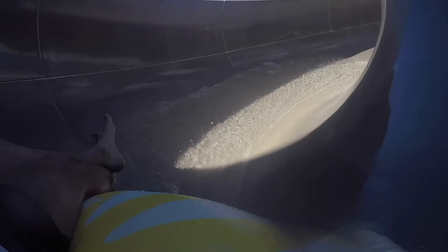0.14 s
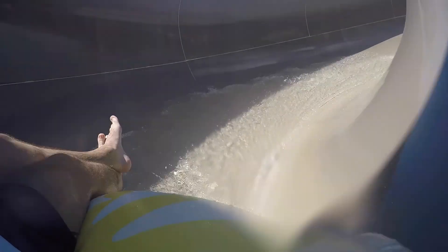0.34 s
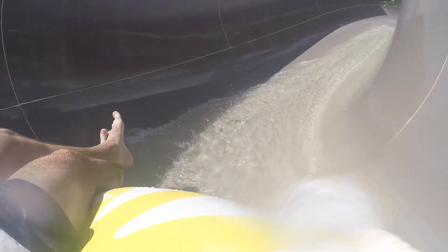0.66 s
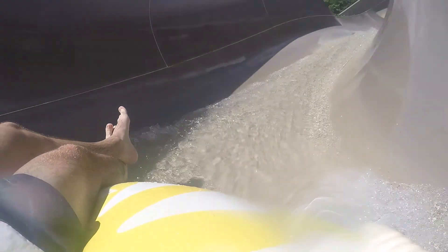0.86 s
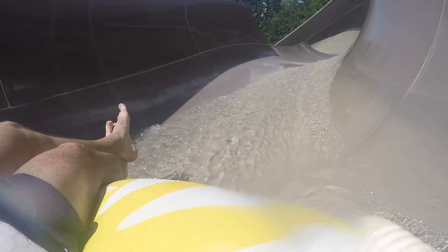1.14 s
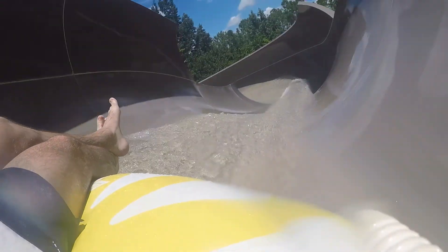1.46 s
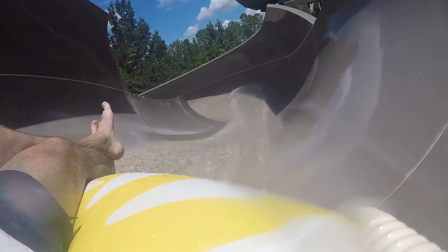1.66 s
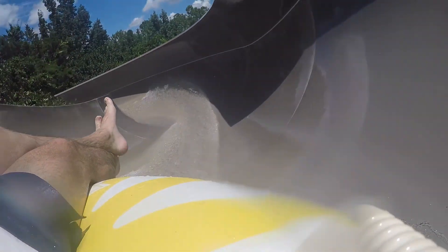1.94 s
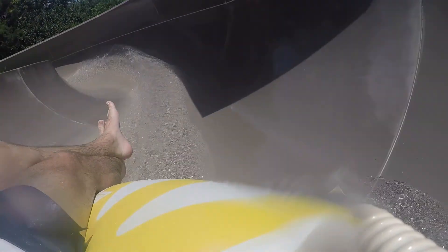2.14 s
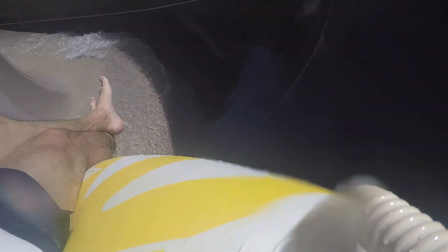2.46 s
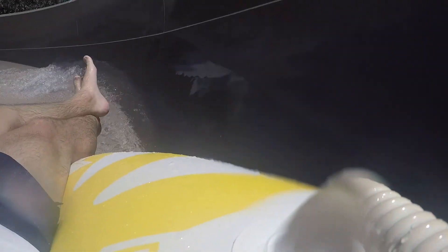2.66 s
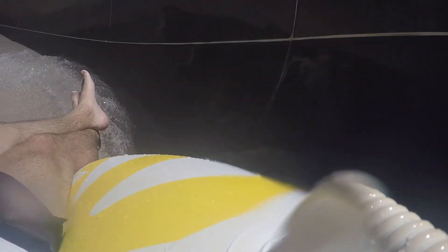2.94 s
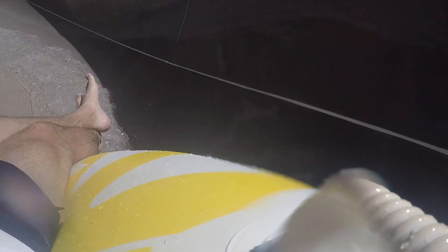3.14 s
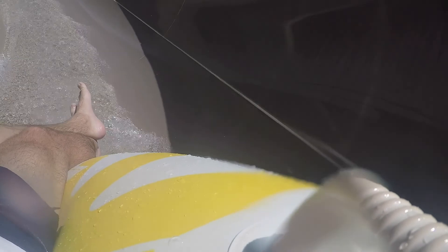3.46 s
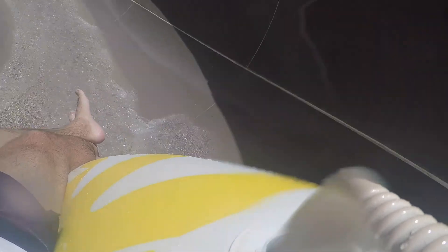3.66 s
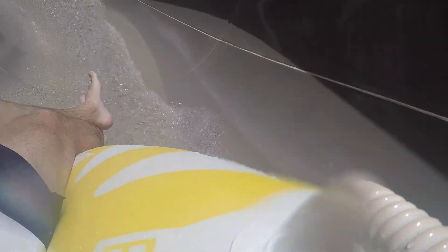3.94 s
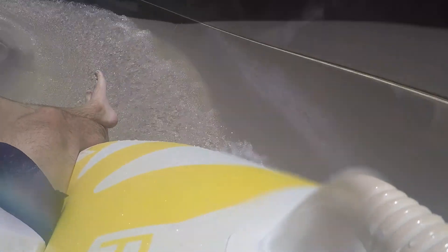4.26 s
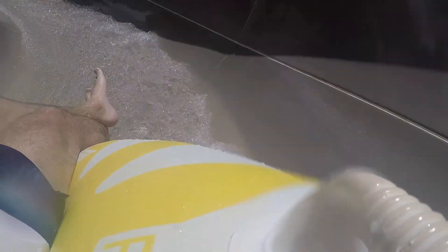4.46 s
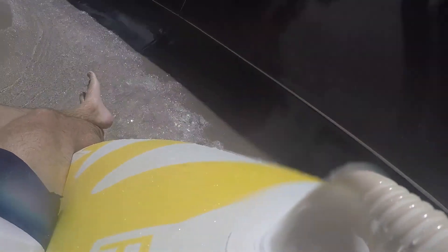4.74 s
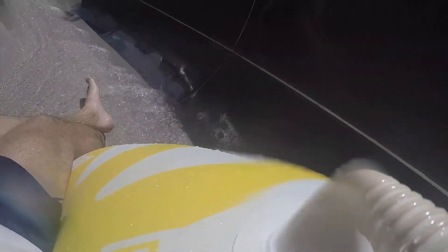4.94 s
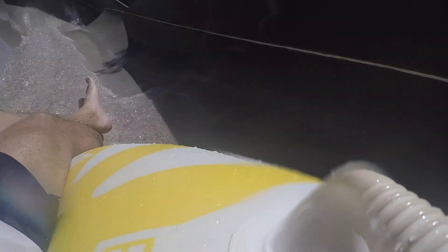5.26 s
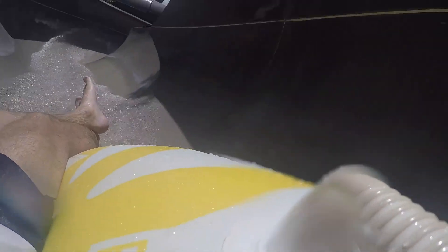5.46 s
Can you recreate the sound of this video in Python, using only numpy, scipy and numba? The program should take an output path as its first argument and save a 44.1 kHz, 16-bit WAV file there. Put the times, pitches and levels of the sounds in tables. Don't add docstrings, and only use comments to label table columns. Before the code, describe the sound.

Steady mid-range water roar with bubbling, fizz and splatter, heard from inside a waterproof case riding on the tube. It begins bright with spray, eases slightly around one to two seconds, then grows fuller and busier. Very low wobbling bumps and flume rumble run below, with brief falling thumps as joints pass. One short sharp knock sounds past the middle; a bubble blips near the end.

```python
import sys
import numpy as np
from scipy import signal
from scipy.fft import rfft, irfft
from scipy.io import wavfile
from scipy.ndimage import uniform_filter1d
from numba import njit

SR = 44100
rng = np.random.default_rng(int(sys.argv[2]) if len(sys.argv) > 2 else 0)


def to_wav(s):
    ch = np.atleast_2d(s).T
    pcm = np.round(np.clip(ch, -1, 1) * 32767)
    wavfile.write(sys.argv[1], SR, pcm.astype(np.int16))


def boost(x):
    u = np.asarray(x, float) / 20
    return 10 ** u


N = 246519
T = np.arange(N) / SR
HZ = np.fft.rfftfreq(N, 1 / SR)

# time_s, water_round_tube_db, spray_thrown_up_db
FLOW = [(0, 0.5, 2.5), (.3, 0.5, -0.5), (.65, -0.5, -1), (1.0, -1, 0.5), (1.12, -1.5, -7.5),
        (1.35, 0.5, -4.5), (1.9, 0.5, -4), (2.1, 0, -5), (2.3, 2, -5), (2.65, 1.5, 2), (2.85, 2.5, 1),
        (3.2, 2, 3.5), (3.55, 1.5, 4), (3.85, -0.5, 1), (4.2, 0, -0.5), (4.6, 0, 3), (5.2, 0.5, 3),
        (5.59, 0, -3)]
# middle_s, level_db, length_s, pitch_hz
JOLTS = [(0.024, -16, 0.029, 28.5), (0.114, -20.5, 0.039, 28), (0.252, -27.5, 0.068, 33.1),
         (0.457, -21.5, 0.1, 38.72), (0.596, -22.5, 0.019, 32.97), (0.704, -32, 0.027, 31.2),
         (0.786, -46, 0.052, 28.4), (0.893, -26.5, 0.057, 41.3), (0.945, -31, 0.038, 37.13),
         (1.07, -41, 0.036, 30.3), (1.15, -27.5, 0.037, 32.5), (1.244, -39, 0.05, 37.94),
         (1.312, -35, 0.053, 33.1), (1.437, -26, 0.11, 40.16), (1.642, -30.5, 0.099, 30.63),
         (1.822, -29.5, 0.084, 28.1), (1.96, -24.5, 0.048, 26.1), (2.028, -41, 0.045, 30.7),
         (2.119, -27.5, 0.043, 25.1), (2.258, -21, 0.061, 26.5), (2.36, -19, 0.051, 35.58),
         (2.475, -20, 0.061, 24.1), (2.587, -24.5, 0.043, 25.6), (2.7, -18.5, 0.085, 29.12),
         (2.932, -18, 0.078, 30.6), (3.081, -14, 0.028, 33.75), (3.155, -12, 0.07, 35),
         (3.298, -16, 0.066, 29.7), (3.432, -18.5, 0.048, 23.05), (3.507, -17, 0.027, 27.62),
         (3.55, -18.5, 0.055, 34.6), (3.637, -17, 0.037, 23.05), (3.758, -29, 0.068, 31.2),
         (3.829, -31, 0.055, 26.5), (3.991, -18, 0.087, 25.3), (4.16, -25, 0.09, 28.8),
         (4.263, -29, 0.03, 29.1), (4.38, -21, 0.15, 29.05), (4.603, -30, 0.057, 40.15),
         (4.694, -30, 0.064, 24.74), (4.818, -22, 0.03, 24.8), (4.914, -23, 0.089, 27.74),
         (5.287, -18, 0.064, 31.8), (5.4, -17.5, 0.07, 27.48), (5.52, -25, 0.042, 26.63)]
# start_s, peak_db, start_pitch_hz, t60_s, pitch_fall_s
JOINTS = [(0.387, -32, 125, 0.18, 0.024), (0.844, -33, 138, 0.21, 0.054), (1.325, -33, 145, 0.3, 0.035),
          (2.302, -26, 128, 0.16, 0.026), (2.587, -20, 150, 0.057, 0.014), (3.044, -31, 126, 0.18, 0.027),
          (3.118, -21.5, 129, 0.15, 0.03), (3.439, -27, 125.7, 0.25, 0.036),
          (3.521, -23.5, 124.5, 0.23, 0.027), (4.294, -18, 125, 0.48, 0.034),
          (4.367, -31, 124, 0.21, 0.032), (4.731, -23.5, 123.1, 0.16, 0.032),
          (5.207, -21.5, 143.4, 0.71, 0.0317), (0.004, -34, 109, 0.29, 0.035), (5.31, -35, 110, .2, 0.055),
          (0.202, -34, 110, 0.17, 0.025), (4.05, -27, 110, 0.18, 0.015), (4.52, -29.5, 100, 0.23, 0.025),
          (4.8, -29, 111, .15, 0.034), (1.41, -39, 70, .2, .08)]
SLANT = [
    (3.888, -22, 90.4, 0.32, 0.079),
]


def unit(x):
    return x / np.sqrt(np.mean(x ** 2))


def colour(x, db):
    return irfft(rfft(x) * boost(db), N)


def slope_db(points):
    hz, db = np.transpose(points)
    return np.interp(np.log(HZ + 1), np.log(hz), db)


def over_time(points):
    return np.interp(T, *np.transpose(points))


def walk(rate):
    hold = int(SR / rate)
    steps = np.repeat(rng.standard_normal(N // hold + 1), hold)
    return 0.847 * uniform_filter1d(uniform_filter1d(steps, hold), hold)[:N]


def flutter(rate):
    quick = walk(rate)
    return quick - uniform_filter1d(quick, size=SR // 5)


def swells(rows):
    return sum(height * np.exp(-np.log(2) * (2 * (T - s) / length) ** 2) for s, height, length in rows)


@njit
def ring(start, hz, cycles, size, glide, n, sr):
    out = np.zeros(n)
    for k in range(len(start)):
        life = cycles[k] * sr / hz[k]
        w, phase, a = 2 * np.pi * hz[k] / sr, 0., size[k]
        fade, bend = np.exp(-1 / life), glide ** (1 / life)
        for i in range(start[k], min(n, start[k] + int(6 * life))):
            phase += w
            out[i] += a * np.sin(phase) * min(phase / 9, 1.)
            a *= fade
            w = min(w * bend, 2.8)
    return out


def grains(count, low_hz, high_hz, cycles, scatter_db, glide):
    when, where, luck = rng.random((count, 3)).T
    hz = low_hz * (high_hz / low_hz) ** where
    louder_db = np.minimum(-scatter_db * np.log(1 - luck), 4 * scatter_db)
    start = (when * N).astype(np.int64)
    return unit(ring(start, hz, np.full(count, cycles), hz * boost(louder_db), glide, N, 1. * SR))


def case_db():
    # pitch_hz, slope_db
    wall_slope = [(120, -3), (200, -12), (420, -16), (700, -15), (1200, -11.5), (2100, -5.5), (3400, -13.5),
                  (5000, -21), (6800, -26), (8200, -32), (11300, -42.5), (15000, -47.5)]
    # pitch_hz, width_hz, lift_db
    resonances = [(910, 335, 5), (1420, 204, 5), (1674, 210, 3.5), (2480, 357, 9.5), (2555, 160, 0.5),
                  (2800, 283, 5), (3147, 290, 4), (3946, 410, 8), (4500, 440, 2), (5790, 580, 5),
                  (6270, 190, 5), (7330, 1200, 3), (9630, 740, 4.5), (10360, 650, 3), (12400, 1200, 0)]
    lift = sum(db / (1 + (2 * (HZ - hz) / width) ** 4) for hz, width, db in resonances)
    bass_loss = 24 * np.log2(np.maximum(110 / (HZ + 1), 1))
    return slope_db(wall_slope) + lift - bass_loss


def foam():
    hiss, surge, near = np.zeros(N), flutter(12), flutter(10.0)
    gust = flutter(29.7)
    white = rfft(rng.standard_normal(N))
    for octave in np.arange(6.5, 14.1, .25):
        band = np.clip(1 - 4 * np.abs(np.log2(HZ + 1) - octave), 0, 1) ** .5
        patch = irfft(white * band, N)
        near = near + 0.69 * flutter(16)
        treble = np.clip(octave - 11.5, 0, 1)
        flicker_db = 0.21 * surge + 0.33 * near + 0.36 * flutter(25.12) + 0.74 * treble * gust
        hiss += patch * boost(flicker_db)
    return unit(hiss)


def churning():
    bubbles = grains(count=9000, low_hz=510.0, high_hz=5155.0, cycles=4.37, scatter_db=2.5, glide=1.06)
    droplets = grains(count=1600, low_hz=1176.0, high_hz=12270.0, cycles=19.0, scatter_db=2.5, glide=1.03)
    crackle = grains(count=14000, low_hz=2540.0, high_hz=14050.0, cycles=1.65, scatter_db=1.5, glide=1.0)
    return foam() + boost(-12) * bubbles + boost(-11.5) * droplets + boost(-5.5) * crackle


def through_wet_case(x, wet):
    heard = rfft(x) * boost(case_db())
    lean_db = 6.0 * np.tanh((HZ - 2650) / 250) / (1 + ((HZ - 2650) / 800) ** 4)
    dry_case = irfft(heard * boost(lean_db), N)
    wet_case = irfft(heard * boost(-.5 * lean_db), N)
    return (1 - wet) * dry_case + wet * wet_case


def water():
    # time_s, wetness (0-1)
    film = [(0, 0.03), (.6, 0.1), (1.0, 0), (1.9, 0.06), (2.3, 0.29), (3.0, 0.2), (3.7, 0.3), (4.4, 0.33),
            (5.0, 0.24), (5.59, 0.35)]
    layer_edges = [1150, 2200, 4500, 8000, 11300]
    # level_db, share_of_water, share_of_spray, wet_case_db, fineness (0-1)
    layer_rows = [
        (-49.5, 1.47, 0.017, 0.1, 0.3),
        (-45.5, 1.43, 0.18, -1, 0.08),
        (-41, 0.91, 0.34, 1.5, 0.36),
        (-53, 0.095, 0.58, -3.5, 0.68),
        (-62.5, 0.78, 0.41, 8, 0.68),
        (-67.5, 0.3, 0.43, -0.5, 0.95),
    ]
    # middle_s, swell_db, length_s, fineness (0 heavy slosh - 1 spray)
    surges = [(.005, 3, 0.03, 0.8), (0.137, 4.5, 0.045, .7), (.52, 2.5, .04, 0.2), (.575, 3, .035, 0.5),
              (.59, -1, .03, 1), (1.285, 4, 0.03, 0.08), (1.29, -1, .03, .95), (1.454, 0.5, .04, 0.4),
              (1.725, 2, 0.028, .35), (1.86, 2.5, .04, .3), (2.434, 2.5, .03, 0.4),
              (2.573, 2.5, 0.035, 0.2), (2.737, 3, 0.028, 0.7), (3.633, 3, .04, 0.76), (3.91, 4, .03, 0.7),
              (4.1, 0.5, .04, 0.5), (4.03, 3, .03, .75), (4.568, 2, .04, .4), (4.96, 2, 0.063, .1),
              (5.017, 1.5, 0.037, 0.5), (5.074, 4, .03, 0.54), (5.137, 1, 0.022, .4), (0.276, 2, .06, 0),
              (0.803, 1, 0.046, 0.7), (2.023, 7, 0.031, 0.52), (2.183, 5.5, 0.12, 0.18),
              (2.317, 4.5, 0.027, 0.6), (2.413, 6, .04, 0.77), (2.45, 6, .03, 0.77),
              (2.508, 4, 0.038, 0.48), (2.725, 4.5, 0.035, 0.16), (2.81, 5.5, 0.025, 0.08),
              (2.317, 4, 0.022, 0.25), (2.884, 0.5, 0.082, 0), (3.043, 3, 0.04, 0.19),
              (3.346, -0.5, 0.047, 0.5), (4.063, 0, .06, .35), (4.385, 3, 0.087, 0.47),
              (4.775, 2.5, 0.11, 0.44), (5.082, -1.5, 0.11, 0.24), (5.397, 6.5, 0.034, 0.49)]
    # time_s, level_db
    haze = [(0, -3.5), (.3, 3), (.7, 1), (1.0, 1), (1.5, -1), (2.4, 1), (2.8, 2.5), (3.4, -3), (4.0, -.5),
            (4.8, -2.5), (5.3, -1.5), (5.59, -1)]
    haze_shares = [
        0.01,
        0.01,
        0.01,
        0.22,
        0.4,
        1.01,
    ]

    wet = np.clip(over_time(film), 0, 1)
    heard = rfft(through_wet_case(churning(), wet))
    s, *ride = np.transpose(FLOW)
    flow_db, spray_db = (np.interp(T, s, db) for db in ride)
    haze_db = over_time(haze)

    def surge_db(fine):
        return swells((s, db * np.exp(-((fine - f) / 0.18) ** 2), length) for s, db, length, f in surges)

    below = [0 * HZ] + [1 / (1 + (HZ / edge) ** 12) for edge in layer_edges] + [1 + 0 * HZ]
    out = np.zeros(N)
    for low, high, row, haze_share in zip(below, below[1:], layer_rows, haze_shares):
        db, water_share, spray_share, wet_db, fine = row
        layer = unit(irfft(heard * (high - low), N))
        gain_db = db + water_share * flow_db + spray_share * spray_db + wet_db * wet
        gain_db = gain_db + surge_db(fine) + haze_share * haze_db
        out += layer * boost(gain_db)
    return out


def bounce():
    sway = np.cumsum(np.exp(0.124 * flutter(34)) - 1) / SR
    out = np.zeros(N)
    for s, db, length, hz in JOLTS:
        shape = np.sqrt(2 * swells([(s, boost(db) ** 2, length)]))
        out += shape * np.sin(2 * np.pi * (hz * (T + sway) + rng.random()))
    return boost(-2.0 + 3.0 * flutter(45)) * out


def shaking():
    jolted = swells((s, boost(db - 15.5) ** 2, 1.13 * length) for s, db, length, hz in JOLTS)
    return np.sqrt(boost(-38.5) ** 2 + jolted)


def tube():
    # pitch_hz, slope_db
    rumble_slope = [(26, -66), (45, -1), (88, -14), (146, -32), (300, -45), (390, -85), (660, -120)]
    shake = shaking()
    wallow = unit(colour(rng.standard_normal(N), -9 * np.log2((HZ + 1) / 27) ** 2))
    rumble = unit(colour(rng.standard_normal(N), slope_db(rumble_slope))) * boost(1.5 * walk(20))
    shudder = np.zeros(N)
    for s, db, *_ in JOINTS + SLANT:
        shudder += boost(db - 4.5) * (T > s) * np.exp(-np.abs(T - s) / 0.042)
    shudder = uniform_filter1d(shudder, size=SR // 60)
    flow_db = np.interp(T, *np.transpose(FLOW)[:2])
    wall = boost(-45 + flow_db) + shudder
    return bounce() + shake * (wallow + boost(-21.5) * rumble) + rumble * wall


def joints():
    out, rough = np.zeros(N), walk(60)
    for s, db, hz, t60, fall in JOINTS + SLANT:
        i = int((s - .004) * SR)
        t = T[:min(20000, N - i)]
        pitch = (30 + (hz - 30) * np.exp(-t / fall)) * (1 + 0.041 * rough[i:i + len(t)])
        shape = (1 - np.exp(-t / 0.009)) * 1000. ** (-t / t60)
        out[i:i + len(t)] -= boost(db - 0.5) * shape * np.sin(2 * np.pi * np.cumsum(pitch) / SR)
    return colour(out, -10 * np.log10(1 + (36 / (HZ + 1)) ** 6))


def bursts(events, spread, length, trim_db):
    out, through = np.zeros(N), colour(rng.standard_normal(N), case_db())
    for s, db, hz in events:
        i = int(s * SR)
        t = T[:min(4096, N - i)]
        edges = [hz / spread, min(hz * spread, 16000)]
        band = signal.butter(2, edges, "bandpass", fs=SR, output="sos")
        puff = signal.sosfilt(band, through[i:i + len(t)])
        shape = (1 - np.exp(-t / (.15 * length))) * np.exp(-t / length)
        out[i:i + len(t)] += boost(db + trim_db) * unit(puff) * shape
    return out


def drops_on_case():
    # start_s, peak_db, centre_hz
    drops = [(0.044, -30, 4870), (0.0727, -31, 5060), (0.1241, -32, 4900), (0.2, -30, 5250),
             (0.4444, -40, 5070), (0.573, -26, 4540), (0.7985, -27.5, 5500), (1.0057, -33, 4590),
             (1.0331, -30, 4560), (1.2825, -40, 6100), (1.402, -33, 5100), (2.0263, -37, 5600),
             (2.1355, -41, 4600), (2.2623, -34, 5685), (2.3126, -29, 5520), (2.4299, -33, 5960),
             (2.5112, -41, 5950), (2.5112, -33, 5550), (2.8828, -38, 5840), (2.9906, -37, 4500),
             (3.0739, -29, 5700), (3.1227, -28, 4500), (3.6177, -39, 5860), (4.3974, -46, 4577),
             (4.7311, -42, 5520), (4.961, -45, 6240), (5.0479, -31, 4560), (5.2165, -43, 5590),
             (5.2618, -45, 4810), (5.3633, -35, 6330)]
    ticks = [(0.1256, -47, 10300), (0.2907, -41, 9960), (0.5901, -42, 9460), (0.7911, -43, 9400),
             (1.2825, -42, 9540), (2.0273, -42, 9920), (2.0682, -44, 9530), (2.1834, -43, 9540),
             (2.2598, -44, 8570), (2.3082, -37, 9300), (2.3186, -37, 9870), (2.4019, -38, 7900),
             (2.4024, -38, 9500), (2.4842, -38, 9540), (2.5137, -37, 9370), (2.5536, -49, 8180),
             (2.7282, -38, 9590), (3.0753, -43, 9400), (3.3602, -35, 9500), (4.3992, -41, 9400),
             (4.6002, -40, 9470), (5.1692, -44, 8750), (5.217, -39, 8970), (5.3653, -42, 9280)]
    pinpricks = [(0.9117, -55, 13600), (2.1833, -56, 13600), (2.2694, -57, 13600), (2.313, -54, 13600),
                 (2.4094, -54, 13600), (2.5494, -55, 13600), (2.826, -50, 13600), (3.3587, -49, 13530),
                 (4.0141, -52, 13440), (4.4227, -60, 13670), (4.5988, -45, 13800), (4.729, -46, 13700)]
    out = bursts(drops, spread=1.13, length=0.0056, trim_db=-8.0)
    out += bursts(ticks, spread=1.09, length=0.008, trim_db=-8)
    return out + bursts(pinpricks, spread=1.19, length=0.0046, trim_db=-1.0)


def thuds_and_waves():
    # start_s, peak_db, centre_hz
    thuds = [(0.511, -39, 163), (0.843, -51, 170), (1.14, -55, 233), (1.479, -45, 163), (1.852, -44, 161),
             (2.294, -38, 242), (2.511, -46, 171.4), (2.582, -43, 271), (2.665, -66, 188.3),
             (3.037, -52, 166.4), (3.115, -49, 196.6), (4.411, -39.5, 237), (4.721, -53, 164.8),
             (5.324, -42, 160.9), (0.1, -46, 150), (1.33, -45, 170), (1.75, -51, 170), (2.95, -44, 170),
             (4.06, -47, 280), (4.88, -42, 200), (5.21, -45, 200)]
    slaps = [(0.267, -34, 1670), (0.565, -37, 1490), (0.999, -39, 1750), (2.009, -29, 1412),
             (2.179, -31.5, 1380), (2.28, -29, 1580), (2.313, -33, 1540), (2.409, -33, 1420),
             (2.436, -44, 1400), (2.499, -34, 1595), (2.696, -35, 1634), (2.738, -30, 1910),
             (2.795, -31, 1675), (2.87, -29, 1604), (2.905, -30.5, 1910), (3.039, -32, 1560),
             (3.093, -33.5, 1480), (3.192, -40, 1420), (4.028, -43, 2040), (4.17, -38, 1956),
             (4.36, -50, 1690), (5.105, -45, 870)]
    splashes = [(0.825, -23, 2630), (0.8664, -32, 2790), (1.2276, -27, 3020), (1.6008, -20, 3170),
                (2.2957, -29, 2480), (2.5012, -25, 2410), (2.5436, -19, 2320), (2.7072, -21, 2520),
                (2.797, -30, 2540), (2.8465, -40, 2560), (2.8833, -20, 2540), (3.1849, -31, 2720),
                (3.331, -37, 2570), (3.3662, -21.5, 2740), (3.456, -14.5, 2730), (3.5264, -19, 2500),
                (3.8372, -18, 2450), (3.8995, -24, 2480), (4.1, -17, 2330), (4.3799, -19, 2470),
                (4.4244, -20, 2520), (4.5563, -20.5, 2450), (5.3728, -29, 2640), (5.395, -17, 2870),
                (5.4, -28, 2500), (5.008, -19, 2550), (5.135, -29, 2650), (1.725, -28, 2650),
                (3.164, -31, 2600)]
    out = bursts(thuds, spread=1.73, length=0.057, trim_db=-4)
    out += bursts(slaps, spread=1.177, length=0.014, trim_db=-2.5)
    return out + bursts(splashes, spread=1.08, length=0.011, trim_db=-13.5)


def lone_bubbles():
    # start_s, peak_db, t60_s
    bubble_rows = [
        (1.139, -29.5, 0.12),
        (2.169, -31, 0.06),
        (4.029, -25, 0.045),
        (5.104, -19, 0.048),
    ]
    knock = [
        (3.1843, -13, .024),
    ]
    ping = [
        (3.3606, -24.5, 0.015),
    ]
    pitches = [
        242,
        815,
        1996,
        845,
        2720,
        9500,
    ]
    s, db, t60 = np.transpose(bubble_rows + knock + ping)
    hz = np.array(pitches, float)
    cycles = t60 * hz / np.log(1000)
    return ring((s * SR).astype(np.int64), hz, cycles, boost(db - 10.5), 1.032, N, 1. * SR)


def scene():
    mix = water() + tube() + joints()
    mix += drops_on_case() + thuds_and_waves() + lone_bubbles()
    return mix[None]


def band_limit(x):
    return signal.sosfilt(signal.butter(12, 15190, fs=SR, output="sos"), x)


def record(dry):
    kept = signal.sosfilt(signal.butter(2, 12, "highpass", fs=SR, output="sos"), dry)
    kept = signal.sosfilt(signal.ellip(10, .3, 70, 15260, fs=SR, output="sos"), kept)
    return band_limit(kept)


dry = scene()
out = record(dry)
to_wav(out)
```